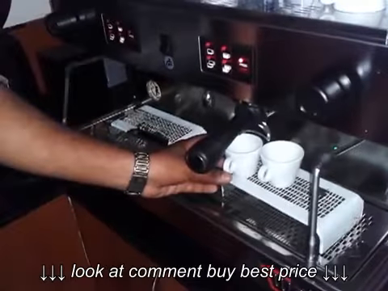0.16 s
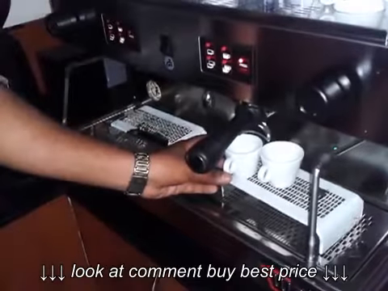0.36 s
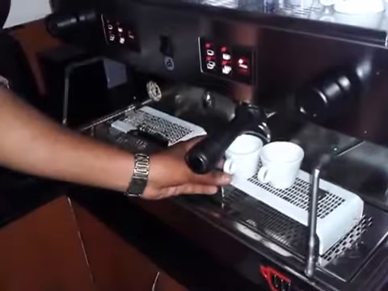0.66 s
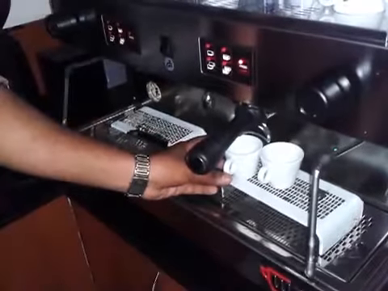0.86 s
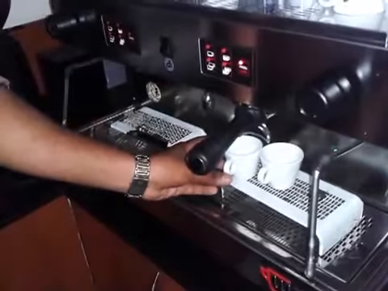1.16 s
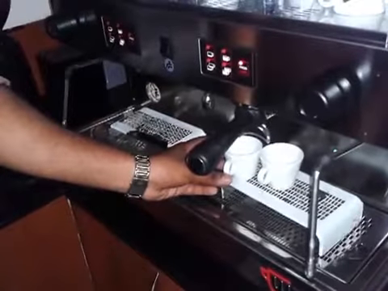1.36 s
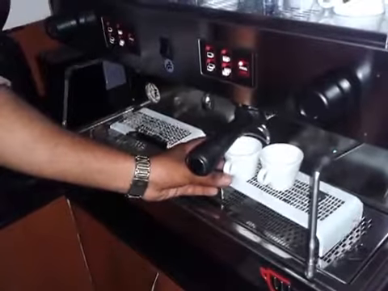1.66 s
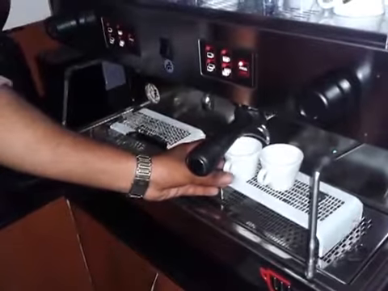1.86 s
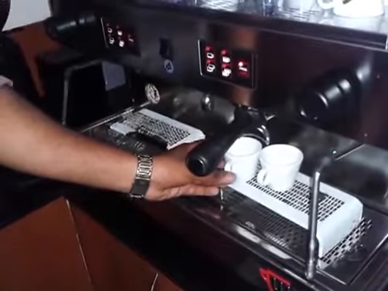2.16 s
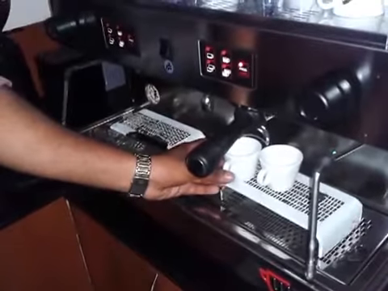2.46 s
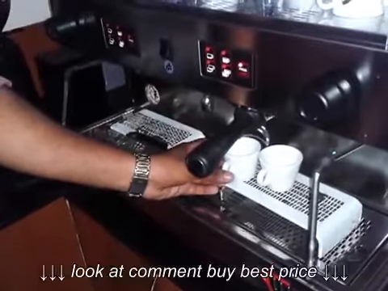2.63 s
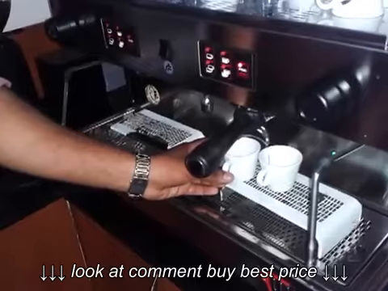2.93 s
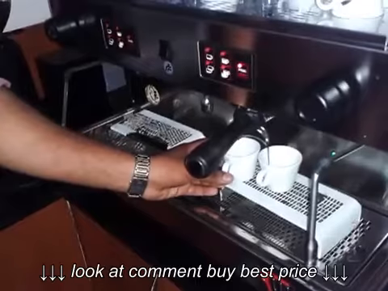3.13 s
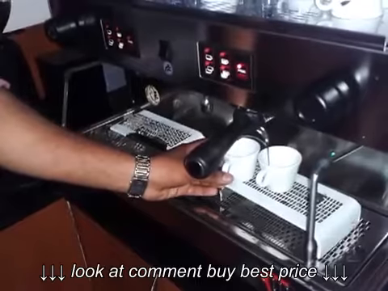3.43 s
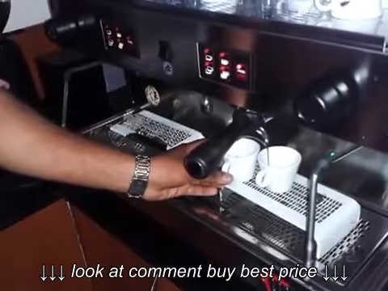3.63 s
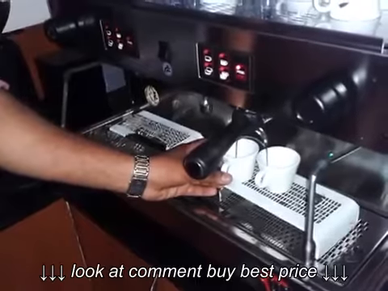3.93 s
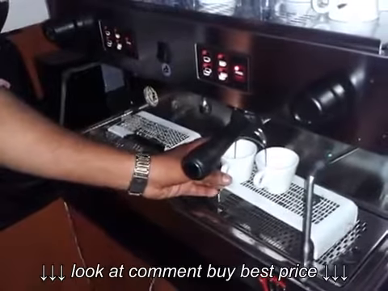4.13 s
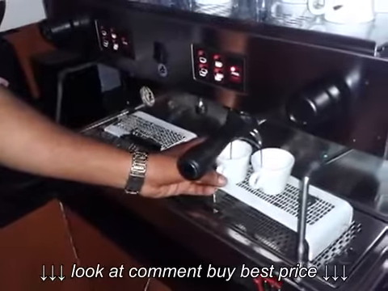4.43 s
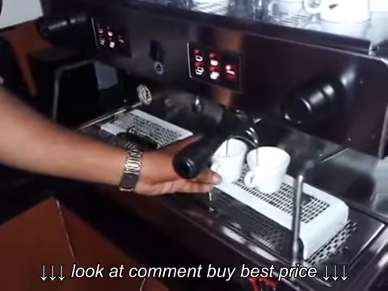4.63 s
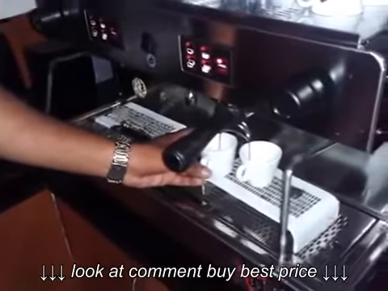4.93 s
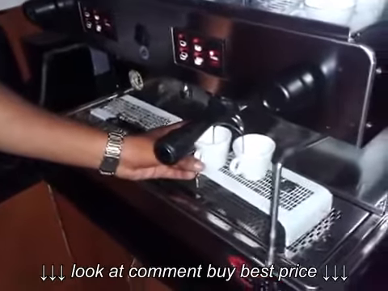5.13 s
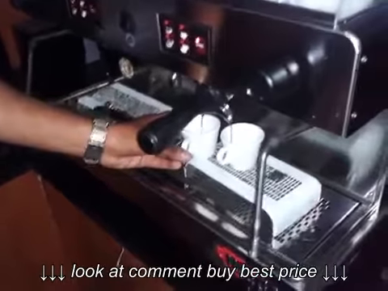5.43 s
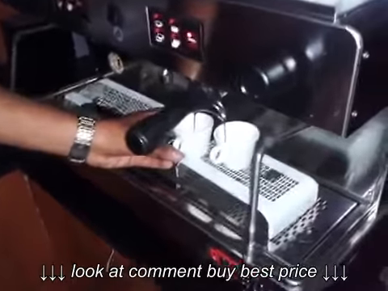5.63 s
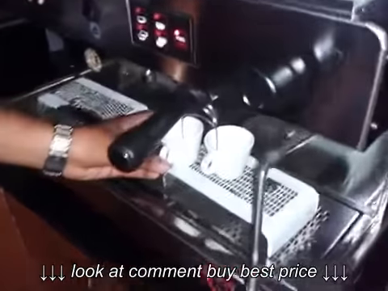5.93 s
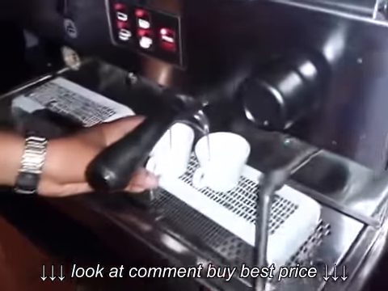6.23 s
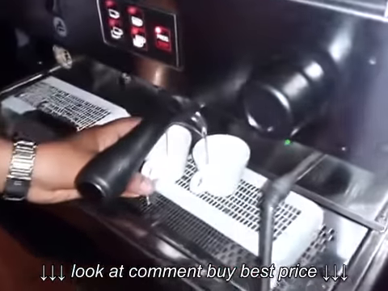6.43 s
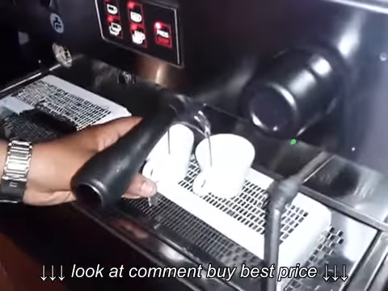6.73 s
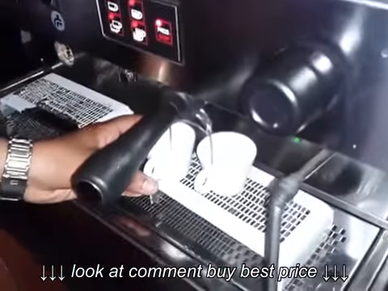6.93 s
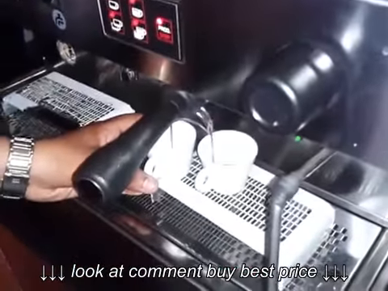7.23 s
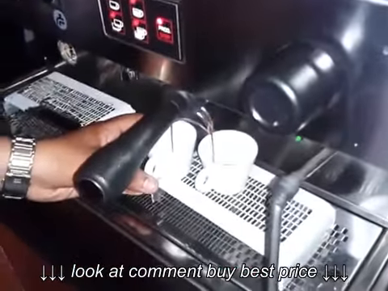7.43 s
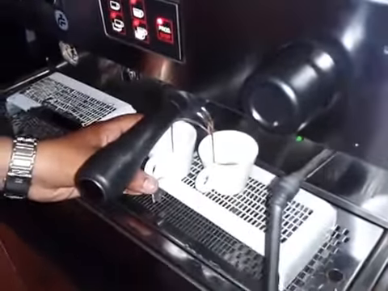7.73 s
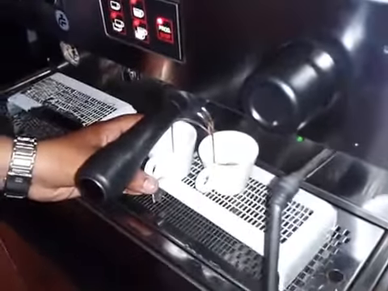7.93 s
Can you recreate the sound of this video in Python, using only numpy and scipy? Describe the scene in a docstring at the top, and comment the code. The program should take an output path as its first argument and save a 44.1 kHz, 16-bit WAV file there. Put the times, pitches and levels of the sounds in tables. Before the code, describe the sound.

An espresso machine runs for the whole eight seconds, close to a mono microphone in a small cafe. Its pump gives a steady, slightly throbbing hum, with churning water and a light rattle from the steel case. Above this, a valve sizzles with a high, faintly whistling hiss, and drops crackle faintly on hot steel. The case ticks softly near 1 and 2.7 seconds. At about 4.3 seconds a small piece of steel clinks once, bright and by far the loudest sound, briefly overloading the microphone and leaving a short, faint ring. From about 5.1 seconds coffee gurgles softly into the cups, growing gradually louder. A few more light ticks come between 6.1 and 6.8 seconds, and the hum shifts slightly in tone as the microphone nears the cups. The hiss swells briefly around 3.3, 6.5 and 7.5 seconds. Hum, hiss and pour continue to the end.

```python
"""A small cafe: an espresso machine brews, close to a mono microphone that moves in on the cups.
The pump hums at twice the mains rate and churns water through the steel case, which rattles and ticks.
A valve sizzles and whistles under pressure, drops fry on hot steel, and coffee starts to run.
Once, a small piece of steel clinks brightly, loud enough to overload the microphone."""
import sys
import numpy as np
from scipy import signal
from scipy.fft import rfft, irfft, next_fast_len
from scipy.io import wavfile
from scipy.ndimage import uniform_filter1d, minimum_filter1d, map_coordinates

SR = 44100
rng = np.random.default_rng(int(sys.argv[2]) if len(sys.argv) > 2 else 0)


def digitize_waveform(pressure):
    """Quantize a signal to 16-bit integers and store it at the path in sys.argv[1].

    Rows of a 2-D input are taken as channels; values are limited to [-1, 1].
    """
    field = np.atleast_2d(pressure).T
    bounded = np.clip(field, -1, 1)
    quanta = np.round(bounded * 32767).astype(np.int16)
    wavfile.write(sys.argv[1], SR, quanta)


N = 356328

HUM_HZ, SHAFT_HZ = 100.24, 23.88
SLIP_HZ = HUM_HZ - 4 * SHAFT_HZ  # the four-pole rotor lags the field
SOUND_M_PER_S = 343

# noise spectra: freq_hz, relative_db
AIR_SPECTRUM = [(2000, -7), (6000, 19), (9000, -5), (11000, -1), (15000, -29)]
SPUTTER_SPECTRUM = [(3000, -23), (6000, -8), (8300, -5), (8800, -2), (9050, 6.5), (9400, -1.5), (11000, -5),
                    (15000, -17.5)]
CUP_SPECTRUM = [(200, -39), (400, -15), (550, 1), (700, 0.5), (1000, -13), (1600, 0), (2500, -25),
                (6000, -29)]
PUMP_BODY_SPECTRUM = [(20, -58), (70, -41), (120, -29), (175, -17), (215, -10), (300, -5.5), (420, -2),
                      (600, -2.5), (780, 2), (1000, -1), (1300, -3.5), (2200, -23.5)]
CASE_SPECTRUM = [(500, -38), (900, -12), (1200, -6), (1650, 0), (1950, -2.5), (2300, -4.5), (2650, -10.5),
                 (3300, -5.5), (5000, -29)]
VALVE_SPECTRUM = [(1500, -45), (2700, -17), (3300, -17), (4000, -9.2), (4900, -7.5), (5400, -2),
                  (5850, -2.2), (6300, -7), (6750, -12.5), (7200, -14.5), (8400, -20), (9700, -29),
                  (12000, -36), (15000, -43)]
SCRAPE_SPECTRUM = [(500, -36), (3000, -21), (4500, -27), (5500, -5), (6200, 2), (7000, -7), (8000, -35),
                   (15000, -50)]
KNOCK_SPECTRUM = [(60, -26), (400, -9), (1500, -1), (4000, 0), (7000, -24), (15000, -50)]

# ticks of the case: start_s, level_db
PANEL_TICKS = [(.971, -32), (2.709, -34), (6.145, -27), (6.394, -22.5), (6.545, -32), (6.746, -32)]
# drops on hot steel: start_s, level_db
FRYING_DROPS = [(.81, -42), (2.19, -42), (2.708, -33), (2.898, -36), (4.195, -38), (4.873, -39),
                (5.74, -43), (6.285, -44), (7.09, -40)]
# microphone path: time_s, place_m
MIC_PATH = [(0, 0.011), (1.4, 0.097), (2.1, 0.17), (4.9, 0.17), (5.7, .22), (6.6, 0.3), (8.08, 0.31)]
# pump hum: harmonic, relative_db, throb_depth, change_near_cups_db
HUM_HARMONICS = [(1, -21, .08, 2.5), (3, 0, 0.04, -1), (4, -3.5, 0.15, 2), (5, -5, .2, 1.5),
                 (6, -0.6, .15, -4), (7, -1, .4, -7), (8, -1.5, .28, -1), (9, -5, 0.3, -3),
                 (10, -15.5, .4, 0), (11, -10, .4, -1), (12, -7, 0.37, -1.5), (13, -6, 0.64, -2),
                 (14, -12, .4, 2), (15, -15, .4, 0), (16, -9.5, 0.6, 1), (18, -9.5, 0.5, -2.5),
                 (19, -13.5, 0.6, -2), (22, -16, .4, -2), (23, -13.5, .4, -5)]
# second harmonic of the hum: time_s, level_db
OCTAVE_LEVELS = [(0.0, -76), (0.38, -59.5), (1.91, -55.5), (2.41, -52), (3.42, -60.5), (3.53, -54),
                 (4.91, -52.5), (5.74, -62.5), (6.17, -53.5), (6.19, -60.5), (7.63, -59), (8.08, -56.5)]
# standing waves of the hum: harmonic, node_m, swing_db
STANDING_WAVES = [(4, 0.26, 3.5), (5, .12, 7.5), (6, 0.031, 0), (7, .11, 4.5), (9, 0.15, 3)]
# swells and dips of single harmonics: harmonic, centre_s, change_db, half_width_s
HARMONIC_SWELLS = [(4, 5.6, -5, .4), (5, 5.4, 3.5, .35), (6, .5, -3, .45), (6, 5.7, 2, .4),
                   (13, 4.25, 5.5, .75)]
# tones of the turning pump: shaft_multiple, level_db
ROTOR_TONES = [(6, -73), (14, -57), (16, -56), (20, -56), (22, -55), (23, -56), (28, -56), (32, -50),
               (36, -59), (44, -54)]
# faint drones between the harmonics: pitch_hz, level_db
DRONE_TONES = [(161, -80), (252, -77), (272, -58.5)]
# spells of harder case rattle: centre_s, extra_db, half_width_s
RATTLE_SWELLS = [(1.3, 1.5, 0.6), (6.2, 1.3, 0.56)]
# water flow, as strength of the valve hiss: time_s, flow_db
WATER_FLOW = [(0.0, -28.5), (0.65, -29.5), (1.33, -28.5), (1.85, -29.2), (2.15, -31.5), (3.7, -32),
              (5.45, -31.5), (5.85, -29.5), (6.1, -31.5), (6.55, -30), (7.45, -29.5), (7.8, -31),
              (8.08, -29.5)]
# pressure surges in the valve: centre_s, level_db, half_width_s
VALVE_SURGES = [(3.12, -35, 0.085), (3.34, -31, .06), (6.456, -33.5, 0.12), (7.545, -28.5, .06)]
# short spits of the valve: centre_s, level_db, half_width_s
VALVE_SPITS = [(.624, -36, .003), (1.072, -38, .004), (1.673, -38, .008), (7.534, -29, .006)]
# bore resonances: pitch_hz, half_width_hz, relative_db, start_s, stop_s
VALVE_WHISTLES = [(3154, 38, -20, 0, 1.7), (4160, 18, -18.5, 2, 4.6), (4420, 20, -17, 6.5, 8.5),
                  (4880, 20, -15.5, 1.5, 5), (4970, 20, -16, 5, 8.5), (5220, 20, -17, 0, 4.5),
                  (5410, 30, -9.5, 6, 8.5), (5400, 24, -12, 0, 5.8), (5640, 50, -13.5, 0.5, 8.5),
                  (5790, 24, -17, 0, 2), (5900, 34, -8, 6, 8.5), (7035, 24, -25, -2, 4.3),
                  (7880, 50, -25.5, 0, 4.5)]
# modes of the steel piece: pitch_hz, relative_db, t60_s, swell_s, linger_db
STEEL_MODES = [(5940, -22, .22, .003, -8), (5977, -6.5, .2, .003, -22), (6015, -10, .2, .003, -17),
               (6031, -10.5, .2, .006, -12), (6205, -20, .12, .003, -30), (6471, -2.2, .24, .01, -11.5),
               (6483, -11.5, .24, .005, -18), (6670, -28, .15, .003, -30), (10740, -41, .28, .003, -20)]
# contacts of the steel piece: start_s, ring_db, scrape_db, knock_db
STEEL_CONTACTS = [(4.3445, 3, -28, -24), (4.3555, -23, -10.5, -27), (4.3675, -24, -15, -32)]


def amp(db):
    """Decibels to gain."""
    return 10 ** (np.asarray(db) / 20)


def unit(x):
    """x at rms 1."""
    return x / np.sqrt(np.mean(x ** 2) + 1e-20)


def clock():
    """Time of every sample in seconds."""
    return np.arange(N) / SR


def curve(rows):
    """(time_s, value) rows interpolated to every sample."""
    return np.interp(clock(), *np.transpose(rows))


def bell(centre_s, half_width_s):
    """Gaussian envelope, peak 1."""
    return np.exp(-((clock() - centre_s) / half_width_s) ** 2)


def burst(start_s, rise_s, t60_s):
    """Envelope with a soft onset and exponential decay."""
    t = np.maximum(clock() - start_s, 0)
    return (1 - np.exp(-(t / rise_s) ** 2)) * amp(-60 * t / t60_s)


def wobble(rate_hz):
    """Smooth random curve with knots at rate_hz."""
    knots = rng.standard_normal(int(N * rate_hz / SR) + 4)
    return map_coordinates(knots, [clock() * rate_hz], mode="nearest")


def filtered(x, response):
    """x through the gain response(hz)."""
    size = next_fast_len(N + SR // 2)
    return irfft(rfft(x, size) * response(np.fft.rfftfreq(size, 1 / SR)), size)[:N]


def coloured(x, spectrum):
    """x shaped by a spectrum table on a log axis, rms 1."""
    freq_hz, db = np.transpose(spectrum)
    return unit(filtered(x, lambda hz: amp(np.interp(np.log(hz + 1), np.log(freq_hz), db))))


def resonant_noise(centre_hz, half_width_hz):
    """Noise in one resonance, rms 1."""
    noise = rng.standard_normal(N)
    return unit(filtered(noise, lambda hz: 1 / (1 + ((hz - centre_hz) / half_width_hz) ** 2)))


def echoed(x, t60_s, wet_db):
    """x plus a dense tail of reflections."""
    t = np.arange(SR) / SR
    tail = rng.standard_normal(SR) * amp(-60 * t / t60_s)
    return x + amp(wet_db) * signal.fftconvolve(x, tail / np.linalg.norm(tail))[:N]


def strokes(rate_hz, sharpness):
    """Gain that peaks once a cycle, rms 1."""
    return unit(np.exp(sharpness * np.cos(2 * np.pi * (rate_hz * clock() + rng.random()))))


def tone(hz, waver):
    """Sine of wavering strength and phase, rms 1."""
    unrest = wobble(7) + 1j * wobble(7)
    carrier = np.exp(2j * np.pi * (hz * clock() + rng.random()))
    return unit(np.real((1 + waver * unrest) * carrier))


def air(level_db=-51):
    """Smooth background hiss."""
    return amp(level_db) * coloured(rng.standard_normal(N), AIR_SPECTRUM)


def panel_ticks():
    """A loose panel of the case ticks softly."""
    envelope = sum(amp(db) * burst(start_s, rise_s=.005, t60_s=.081) for start_s, db in PANEL_TICKS)
    return envelope * resonant_noise(centre_hz=1900, half_width_hz=170)


def sputter(level_db=-47):
    """Water fries on hot steel: uneven fine crackle, with a spurt for each drop."""
    unrest_db = np.minimum(1.9 * (wobble(13) + wobble(40)), 3.5)
    level = amp(level_db + unrest_db)
    for start_s, db in FRYING_DROPS:
        level = np.hypot(level, amp(db) * burst(start_s, rise_s=.0018, t60_s=.11))
    crackle = rng.standard_normal(N) * np.exp(.34 * wobble(2500))
    return level * coloured(crackle, SPUTTER_SPECTRUM)


def bubbles(rate_per_s=70, centre_hz=900, life_cycles=14):
    """Small trapped bubbles ring and rise in pitch; rms 1."""
    t = np.arange(SR // 20) / SR
    start, pitch, size = rng.random((round(rate_per_s * N / SR), 3)).T[:, :, None]
    hz = centre_hz * 2 ** (2 * pitch - 1)
    age = np.minimum(t * hz / life_cycles, 2)
    envelope = amp(10 * size) * age * np.exp(-5 * age)
    blips = envelope * np.sin(2 * np.pi * hz * t * (1 + .06 * age))
    indices = (start * N).astype(int) + np.arange(len(t))
    return unit(np.bincount(indices.ravel(), blips.ravel(), N)[:N])


def pour(start_s=5.1, rise_s=.66, base_db=-44.5, fill_db_per_s=1.15, gurgle_db=3.5, bubble_db=-3):
    """Coffee gurgles in the hollow of the cups, louder as they fill."""
    stream = amp(gurgle_db * wobble(30)) * coloured(rng.standard_normal(N), CUP_SPECTRUM)
    running_s = clock() - start_s
    level = np.clip(running_s / rise_s, 0, 1) * amp(base_db + fill_db_per_s * running_s)
    return level * (stream + amp(bubble_db) * bubbles())


def harmonic_shifts_db():
    """Level shift by harmonic: the microphone crosses standing waves; single harmonics swell or dip."""
    place_m = curve(MIC_PATH)
    shifts_db = {}
    for harmonic, node_m, swing_db in STANDING_WAVES:
        wavelength_m = SOUND_M_PER_S / (harmonic * HUM_HZ)
        shifts_db[harmonic] = -swing_db * np.cos(4 * np.pi * (place_m - node_m) / wavelength_m)
    for harmonic, centre_s, db, half_width_s in HARMONIC_SWELLS:
        shifts_db[harmonic] = shifts_db.get(harmonic, 0) + db * bell(centre_s, half_width_s)
    return shifts_db


def pump_hum(base_db=-42.5, approach_s=(6, 7.2)):
    """Mains-locked harmonics throb with the rotor's slip, over rotor tones and faint drones."""
    t = clock()
    shifts_db = harmonic_shifts_db()
    near_cups = np.interp(t, approach_s, [0, 1])
    hum = amp(curve(OCTAVE_LEVELS)) * tone(2 * HUM_HZ, waver=.23)
    for harmonic, db, depth, near_db in HUM_HARMONICS:
        throb = 1 + depth * np.cos(2 * np.pi * (SLIP_HZ * t + rng.random()))
        level = amp(base_db + db + shifts_db.get(harmonic, 0) + near_db * near_cups)
        hum += level * throb * tone(harmonic * HUM_HZ, waver=.018 * harmonic)
    rotor = sum(amp(db) * tone(multiple * SHAFT_HZ, waver=.36) for multiple, db in ROTOR_TONES)
    drones = sum(amp(db) * tone(hz, waver=1) for hz, db in DRONE_TONES)
    return hum + rotor + drones


def pump_churn(body_db=-37, rattle_db=-37.5, flow_coupling=.11):
    """Water churned at each stroke rings the pump body and the thin case; more flow, more rattle."""
    flow_db = curve(WATER_FLOW)
    beat = strokes(HUM_HZ, sharpness=.3)
    body = echoed(rng.standard_normal(N) * beat, t60_s=.14, wet_db=-7.5)
    case = echoed(rng.standard_normal(N) * beat, t60_s=.11, wet_db=-4.5)
    case_db = rattle_db + flow_coupling * (flow_db - flow_db.mean()) - .4 * wobble(5.4)
    case_db += sum(db * bell(centre_s, half_width_s) for centre_s, db, half_width_s in RATTLE_SWELLS)
    rattle = amp(case_db) * coloured(case, CASE_SPECTRUM)
    return amp(body_db) * coloured(body, PUMP_BODY_SPECTRUM) + rattle


def valve_surges():
    """Passing rises of pressure make the valve sing softly in its main resonance."""
    envelope = sum(amp(db) * bell(centre_s, half_width_s) for centre_s, db, half_width_s in VALVE_SURGES)
    return envelope * resonant_noise(centre_hz=5680, half_width_hz=420)


def valve_whistles(wander_hz=8, fade_s=.2):
    """The narrow bore whistles; each pitch wanders with the jet."""
    whistles = np.zeros(N)
    for hz, half_width_hz, db, start_s, stop_s in VALVE_WHISTLES:
        drift_rad = 2 * np.pi * np.cumsum(wander_hz * wobble(6)) / SR
        analytic = signal.hilbert(resonant_noise(hz, half_width_hz), next_fast_len(N))[:N]
        gate = np.interp(clock(), [start_s - fade_s, start_s, stop_s, stop_s + fade_s], [0, 1, 1, 0])
        whistles += amp(db) * gate * np.real(analytic * np.exp(1j * drift_rad))
    return whistles


def valve_sizzle(trim_db=-.3, pops_per_s=3500, pop_db=-3, flutter_db=.55):
    """Tiny cavities collapse in the whistling valve's jet, in time with the hum and four pump vanes."""
    pops = (rng.random(N) < pops_per_s / SR) * rng.standard_normal(N)
    jet = rng.standard_normal(N) + amp(pop_db) * unit(pops)
    jet *= strokes(4 * SHAFT_HZ, sharpness=.11)
    jet *= strokes(HUM_HZ, sharpness=.07) * strokes(2 * HUM_HZ, sharpness=.06)
    level = amp(curve(WATER_FLOW) + trim_db + flutter_db * wobble(45) + .03 * wobble(5.4))
    for centre_s, db, half_width_s in VALVE_SPITS:
        level = np.hypot(level, amp(db) * bell(centre_s, half_width_s))
    hiss = coloured(echoed(jet, t60_s=.13, wet_db=-9), VALVE_SPECTRUM)
    return level * (hiss + valve_whistles())


def steel_clink(settled_s=4.485, settling_s=.043, knock_t60_s=.011, linger_t60_s=.69):
    """Steel strikes, chatters and is damped as it settles; close modes beat, a faint ring lingers."""
    ring, scrape_envelope, knock_envelope = np.zeros((3, N))
    undamped = np.clip((settled_s - clock()) / settling_s, 0, 1)
    for start_s, ring_db, scrape_db, knock_db in STEEL_CONTACTS:
        onset = round(start_s * SR)
        t = np.arange(N - onset) / SR
        scrape_envelope += amp(scrape_db) * burst(start_s, rise_s=.0007, t60_s=.041)
        knock_envelope[onset:] += amp(knock_db - 60 * t / knock_t60_s)
        for hz, mode_db, t60_s, swell_s, linger_db in STEEL_MODES:
            swell = 1 - np.exp(-t / swell_s)
            decay = amp(-60 * t / t60_s) * undamped[onset:] + amp(linger_db - 60 * t / linger_t60_s)
            ring[onset:] += amp(ring_db + mode_db) * swell * decay * np.sin(2 * np.pi * hz * t)
    ring *= 1 + .13 * wobble(500)  # chatter roughens the ring
    scrape = scrape_envelope * coloured(rng.standard_normal(N), SCRAPE_SPECTRUM)
    knock = knock_envelope * coloured(rng.standard_normal(N), KNOCK_SPECTRUM)
    return echoed(ring + scrape + knock, t60_s=.4, wet_db=-18)


def scene():
    """Machine, clink and pour over a smooth hiss, the same in both channels."""
    machine = pump_hum() + pump_churn() + valve_sizzle() + valve_surges() + sputter() + panel_ticks()
    mono = machine + steel_clink() + air() + pour()
    return np.array([mono, mono])


def record(dry, ceiling=1.12, window_samples=130, cutoff_hz=15020):
    """Fast limiter, slightly lopsided clipping, brick-wall low-pass."""
    needed_gain = np.minimum(1, ceiling / (np.abs(dry) + 1e-9))
    gain = uniform_filter1d(minimum_filter1d(needed_gain, window_samples), window_samples)
    oversampled = signal.resample_poly(dry * gain, 4, 1, axis=1)
    clipped = signal.resample_poly(np.clip(oversampled, -.96, .93), 1, 4, axis=1)
    return np.array([filtered(channel, lambda hz: hz < cutoff_hz) for channel in clipped])


dry = scene()
out = record(dry)
digitize_waveform(out)
```